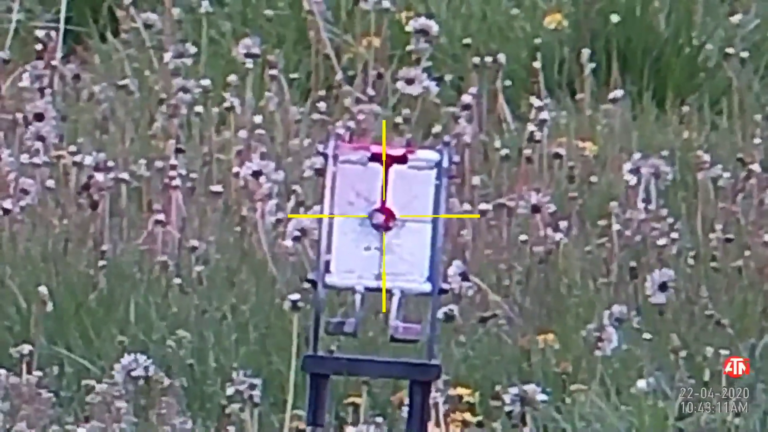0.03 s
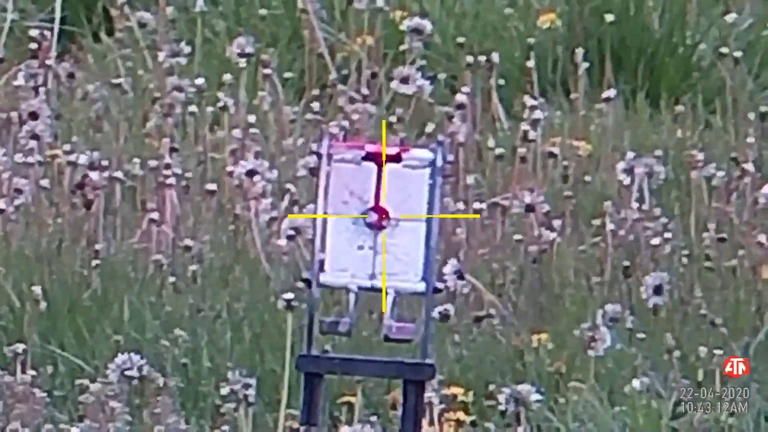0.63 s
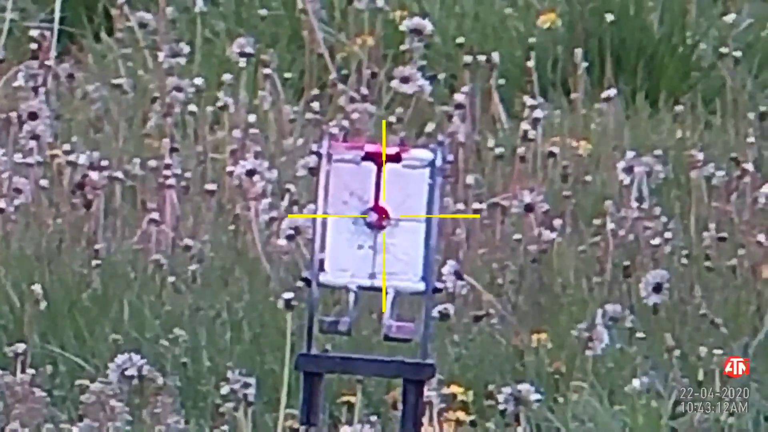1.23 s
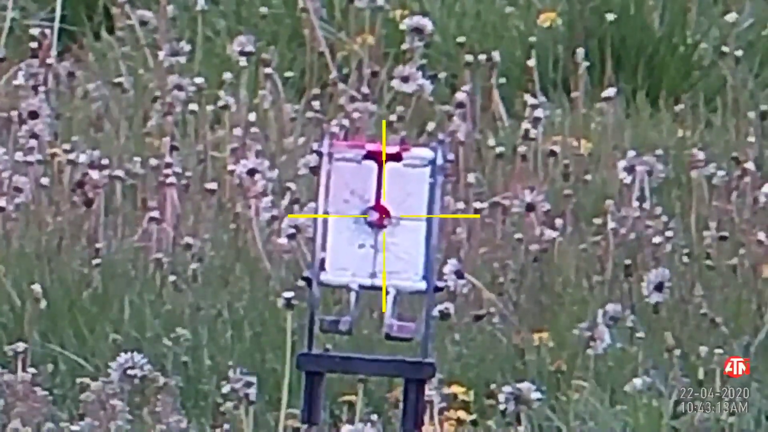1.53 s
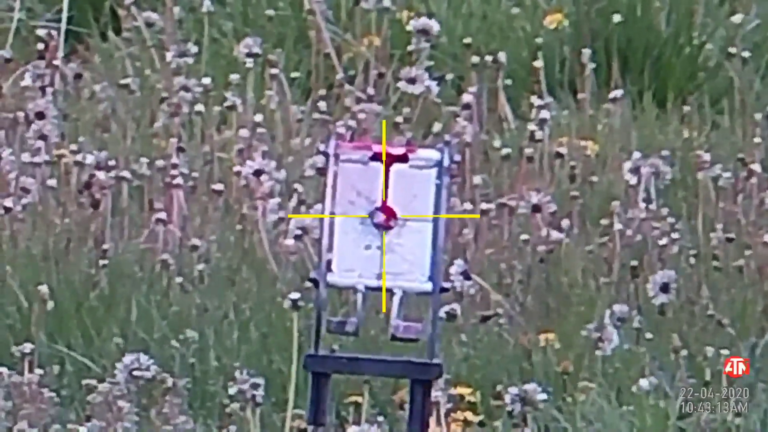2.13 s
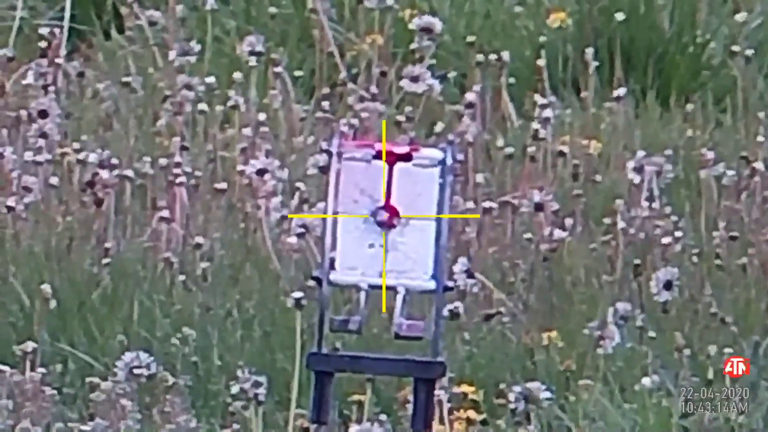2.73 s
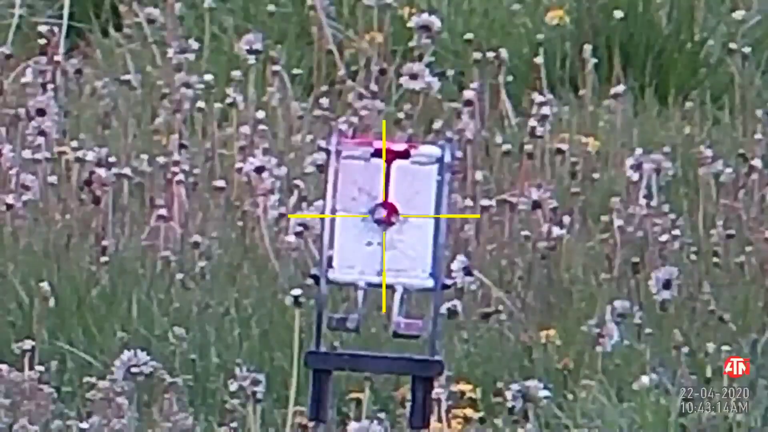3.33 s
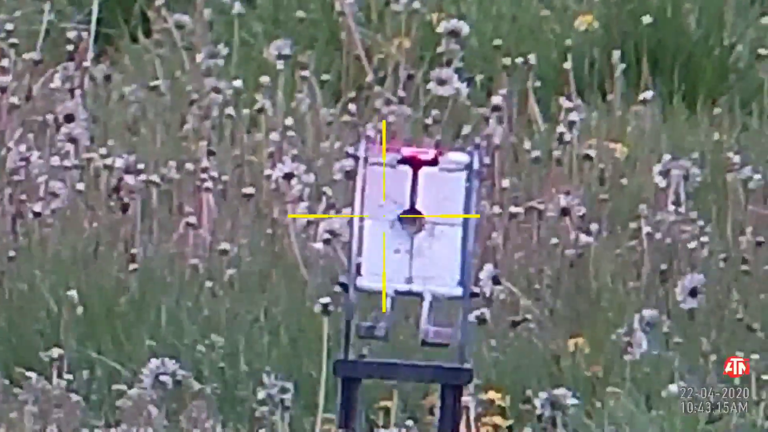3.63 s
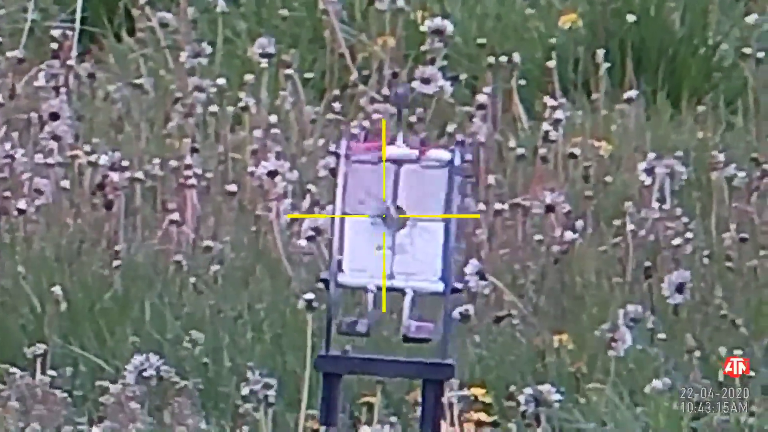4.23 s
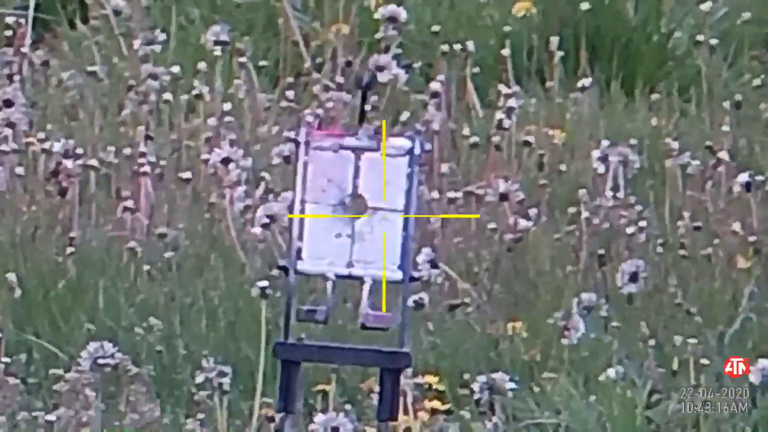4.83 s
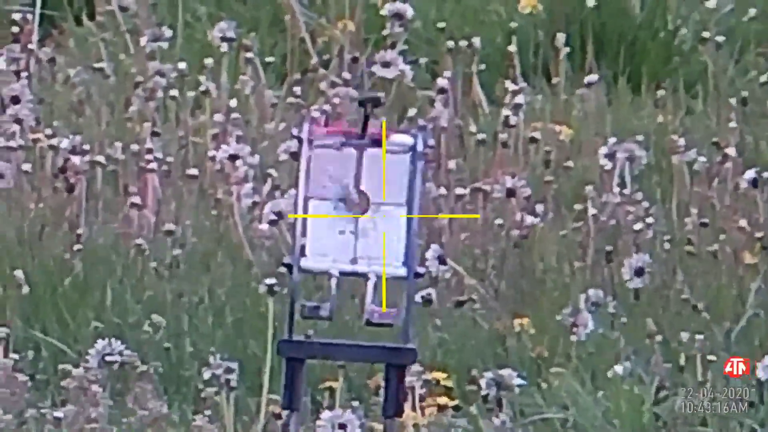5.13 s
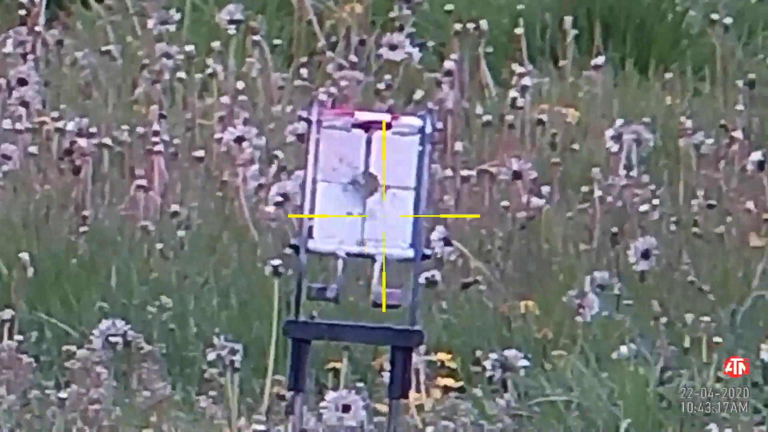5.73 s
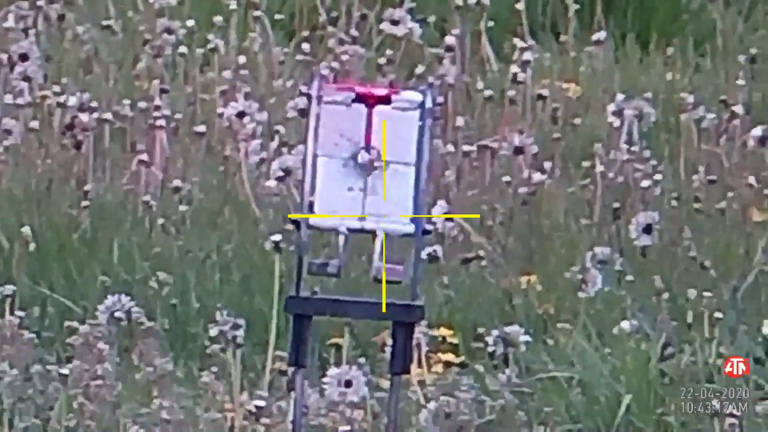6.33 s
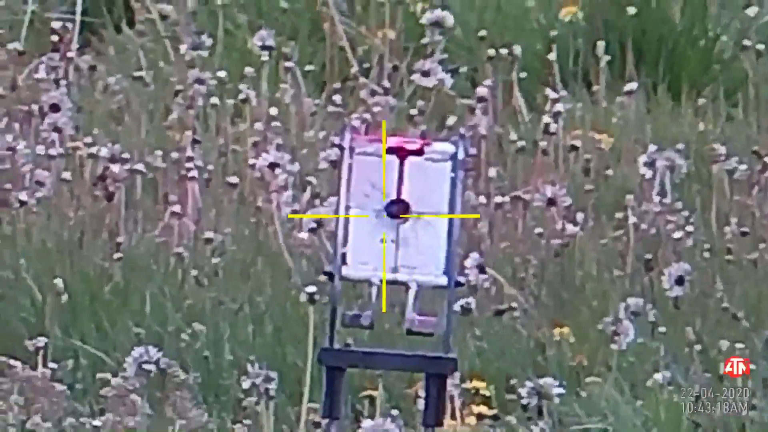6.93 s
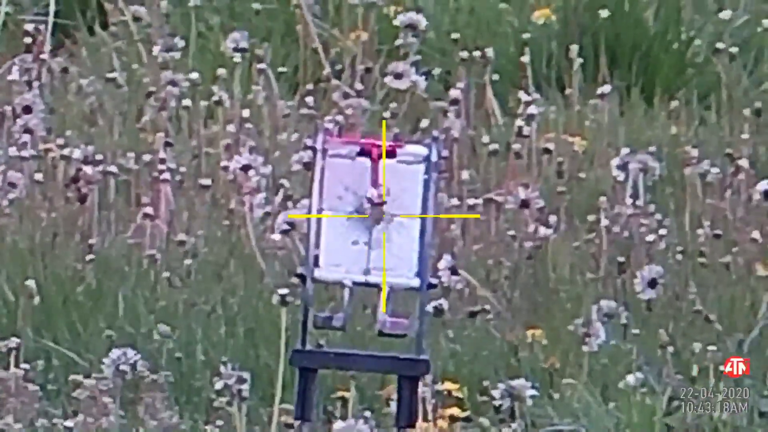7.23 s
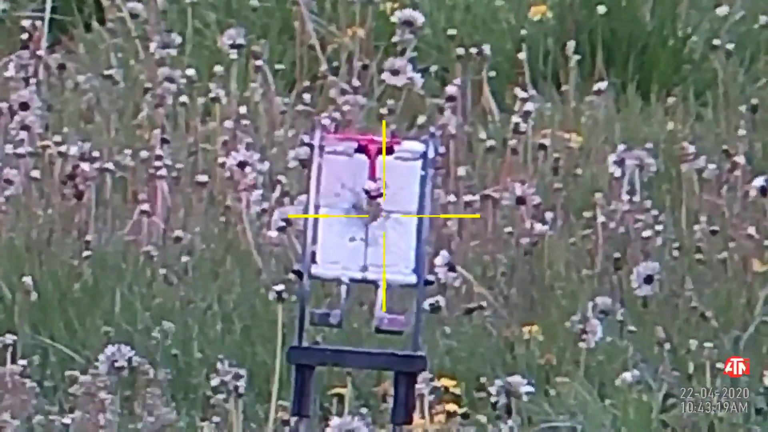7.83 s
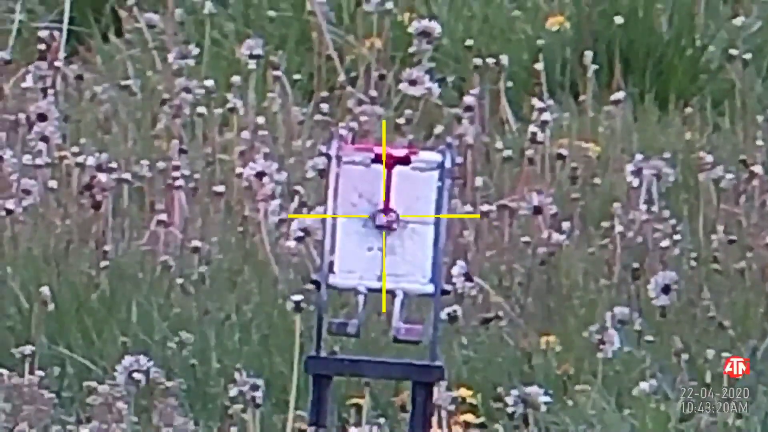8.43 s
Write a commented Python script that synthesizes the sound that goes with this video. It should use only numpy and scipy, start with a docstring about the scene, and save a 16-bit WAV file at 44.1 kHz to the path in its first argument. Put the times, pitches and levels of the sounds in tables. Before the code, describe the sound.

Small birds sing faintly over a light breeze in an open meadow, and a soft shot sounds far away. Then an air rifle fires right at the microphone with a loud snap, a hiss and a brief metallic ring. A moment later the pellet hits a target with a sharp crack that echoes around the field. Steel parts click, and thin bird calls carry on over slight handling noises.

```python
"""Air rifle in a meadow

Small birds sing over a faint breeze and the whine of an electronic sight; another shot sounds far off.
The rifle's sudden release of air overloads the microphone on the sight, and impacts ring the modes of
the action. Hiss trails the receding pellet, whose sharp hit reverberates round the field.
Steel parts click, and distant trees reflect the shot as a soft wash."""
import sys
import numpy as np
from scipy import signal
from scipy.fft import rfft, irfft, next_fast_len
from scipy.io import wavfile
from scipy.ndimage import map_coordinates

SR = 44100
rng = np.random.default_rng(int(sys.argv[2]) if len(sys.argv) > 2 else 0)


def output_pcm(signal):
    """Save a mono or channel-first signal as 16-bit PCM at the path in sys.argv[1].

    Samples are clipped to [-1, 1] before scaling.
    """
    pcm = np.clip(np.atleast_2d(signal).T, -1, 1) * 32767
    wavfile.write(sys.argv[1], SR, np.round(pcm).astype(np.int16))


N = 374850
T = np.arange(N) / SR
AGE = np.arange(SR) / SR  # t/s since an onset, one second long


def amp(db):
    """Amplitude ratio: tenfold for every 20 dB."""
    return 10 ** (np.asarray(db) / 20)


def unit(x):
    """Normalisation to rms 1."""
    return x / np.sqrt(np.mean(x ** 2) + 1e-20)


def along(points, hz):
    """Interpolation of (f/Hz, value) points on a logarithmic frequency axis."""
    f, v = np.transpose(points)
    return np.interp(np.log(hz + 1), np.log(f + 1), v)


def at(s, x):
    """Pure delay: x begins at time s."""
    return np.pad(x, (round(s * SR), N))[:N]


def wobble(rate):
    """Smooth random modulation: a spline through rate knots a second."""
    return map_coordinates(rng.standard_normal(int(N * rate / SR) + 4), [T * rate / SR])


def swells(rows):
    """Gaussian envelopes summed from rows of t/s, half-width/s, level/dB."""
    return sum(amp(db) * np.exp(-((T - s) / half) ** 2) for s, half, db in rows)


def burst(t60, rise=.0003, hold=0):
    """Transient envelope: a rise, a hold, then exponential decay by 60 dB in t60 seconds."""
    return (1 - np.exp(-AGE / rise)) * amp(-60 * np.maximum(AGE - hold, 0) / t60)


def filtered(x, response):
    """Linear filtering: the spectrum of x times a frequency response."""
    n = x.shape[-1]
    size = next_fast_len(n + SR // 10, real=True)
    return irfft(rfft(x, size) * response(np.fft.rfftfreq(size, 1 / SR)), size)[..., :n]


def noise(spectrum, size=N, tilt_db=0):
    """Spectral shaping: noise of rms 1 from (f/Hz, relative level/dB) points and a tilt per octave."""
    response = lambda hz: amp(along(spectrum, hz) + tilt_db * np.log2(hz / 1000 + 1))
    return unit(filtered(rng.standard_normal(size), response))


def glide(length, first_hz, middle_hz, last_hz, db):
    """Frequency and amplitude modulation: a parabola through three pitches, a half-sine envelope."""
    u = AGE[AGE < length] / length
    hz = np.polyval(np.polyfit([0, .5, 1], [first_hz, middle_hz, last_hz], 2), u)
    return hz, amp(db) * np.sin(np.pi * u)


def add_tone(track, s, hz, gain, waver):
    """Phase integrates frequency: a tone is added at time s, made hoarse by fast random modulation."""
    age = np.arange(len(hz))
    jitter = np.interp(age / SR, np.arange(600) / 600, rng.standard_normal(600))
    tone = np.sqrt(2) * gain * np.sin(2 * np.pi * np.cumsum(hz * (1 + waver * jitter)) / SR)
    i = round(s * SR) + age
    inside = (i >= 0) & (i < N)
    track[i[inside]] += tone[inside]


def outdoors(x, wet_db, t60):
    """Diffuse reflection from grass and trees: x plus its convolution with decaying noise."""
    tail = rng.standard_normal(SR) * burst(t60, rise=.0073)
    return x + amp(wet_db) * signal.oaconvolve(x, tail / np.linalg.norm(tail))[:N]


def strike(modes, db, tilt_db, struck_hz, accent_db, rattle_t60):
    """Modal superposition: an impulse and its chatter excite resonances, accented near struck_hz."""
    chatter = (burst(rattle_t60) * rng.standard_normal(SR))[:SR // 10]
    force = signal.unit_impulse(len(chatter)) + .6 * chatter / np.linalg.norm(chatter)
    accent = lambda f: accent_db * np.exp(-(np.log2(f / struck_hz) / .2) ** 2)
    gain = lambda f, level: amp(level + tilt_db * np.log2(f / 1000 + 1) + accent(f))
    # neighbouring modes swing in antiphase
    body = lambda hz: sum((-1) ** k * gain(f, level) * 1j * hz * bw / (f * f - hz ** 2 + 1j * hz * bw)
                          for k, (f, bw, level) in enumerate(modes))
    ring = filtered(force, body)
    return amp(db) * ring / np.linalg.norm(ring) * np.sqrt(SR * .003)  # the energy of 3 ms at this level


# still air: f/Hz, relative level/dB
AIR_SPECTRUM = [(20, -2.5), (60, -7.5), (150, -8.5), (400, -14), (800, -16.5), (1500, -20), (3000, -21.5),
                (7000, -23.5), (12000, -25), (15500, -22.5)]
# likeness of the air at left and right: f/Hz, correlation
AIR_CORRELATION = [(60, 0.03), (180, 0.4), (550, 0.85), (1650, 0.87), (4970, 0.76), (15000, 0.59)]
# gusts: t/s, half-width/s, level/dB
BREEZE_GUSTS = [(.05, .6, -76), (6.15, .2, -76), (6.7, .28, -73), (8.45, .22, -75)]


def meadow():
    """Partial coherence: still air differs left and right, under rumble, breeze and a brief low drone."""
    angle = lambda hz: np.arccos(np.clip(along(AIR_CORRELATION, hz), -1, 1)) / 2
    mid = filtered(noise(AIR_SPECTRUM), lambda hz: np.cos(angle(hz)))
    side = filtered(noise(AIR_SPECTRUM), lambda hz: np.sin(angle(hz)))
    deep = [(3, 0), (15, -2.5), (35, -17), (90, -35.5), (400, -80)]
    rumble = amp(-70 + 2 * wobble(4)) * np.array([noise(deep), noise(deep)])
    wind = (amp(-80) + swells(BREEZE_GUSTS)) * amp(wobble(6))
    breeze = wind * noise([(60, -7), (180, -1), (300, -2), (1400, -.5), (4000, -9), (14000, -22.5)])
    drone = swells([(.6, .42, -77.5)]) * noise([(100, -40), (170, -12), (195, 0), (225, -14), (500, -60)])
    return amp(-67.5) * np.array([mid + side, mid - side]) + rumble + breeze + drone


# harmonics of the whine, fundamental first: level/dB
WHINE_HARMONICS = [-82, -83.5, -87, -91]


def electronics(whine_hz=720, frame_hz=60, skip_share=.25, pip_width_s=.0009):
    """Harmonic series and pulse train: the sight whines steadily and pips on most of its frames."""
    whine = np.zeros(N)
    for k, db in enumerate(WHINE_HARMONICS, 1):
        phase = 2 * np.pi * (k * whine_hz * T + rng.random()) + .15 * k * wobble(3)
        whine += np.sqrt(2) * amp(db) * np.sin(phase)
    frame, part = np.divmod(T * frame_hz, 1)
    present = (rng.random(int(frame[-1]) + 1) > skip_share)[frame.astype(int)]
    pips = present * np.exp(-((part - .5) / frame_hz / pip_width_s) ** 2)
    band = [(12000, -60), (13300, -14), (13700, 0), (14050, 0), (14600, -22), (15050, -9), (15600, -30)]
    return whine + amp(-63) * pips * noise(band)


# notes of a phrase: delay/s, duration/s, first f/Hz, middle f/Hz, last f/Hz, relative level/dB
SONG_NOTES = [(.002, .038, 2200, 2600, 2720, -2), (.047, .023, 3700, 3270, 3130, 3.5),
              (.118, .074, 1900, 2070, 1320, -6)]
# phrases: t/s, level/dB
SONG_PHRASES = [(-.145, -55.5), (.090, -59.5), (.318, -59), (.553, -61.5), (.790, -62), (1.038, -65.5)]
# faint rising peeps: t/s, level/dB
SONG_PEEPS = [(2.996, -71), (3.218, -71), (3.446, -73)]


def songbird(scatter_db=1.2):
    """Frequency glides: a rising note, a flick and an arch, four times a second; later a few peeps."""
    song = np.zeros(N)
    for s, db in SONG_PHRASES:
        for delay, *shape, note_db in SONG_NOTES if s < 1 else SONG_NOTES[:2]:  # last phrase breaks off
            add_tone(song, s + delay, *glide(*shape, db + note_db + rng.normal(0, scatter_db)), waver=.02)
    for s, db in SONG_PEEPS:
        add_tone(song, s, *glide(.018, 2700, 3200, 3450, db), waver=.006)
    return outdoors(song, wet_db=-1.5, t60=.65)


# thin bird calls: t/s, peak f/Hz, duration/s, relative level/dB, frequency ratio of the second voice
HIGH_CALLS = [(.5, 7050, .16, -62.5, .8), (1.138, 6950, .21, -63.5, .86), (1.758, 7200, .13, -62, .84),
              (2.475, 6650, .16, -68, .85), (3.067, 7270, .19, -65, .79), (4.341, 6880, .26, -57.5, 1.16),
              (5.025, 7000, .28, -55.5, 1.12), (5.685, 7510, .11, -65, .78), (5.785, 6850, .075, -61, .8),
              (5.895, 6600, .14, -66, .76), (6.336, 7350, .19, -62.5, .79), (6.53, 7000, .065, -60.5, .88),
              (6.968, 7330, .2, -61, .8), (7.175, 7050, .065, -61.5, .88), (7.65, 7250, .2, -62, .8),
              (8.316, 7130, .17, -64.5, .8)]


def high_calls(peak_s=.027, width_s=.032, drop_share=.08, drop_db=11, sag_hz_per_s=500):
    """Biphonation: both sides of the syrinx sing a hoarse arch that drops to a softer, sinking trail."""
    calls = np.zeros(N)
    for s, peak_hz, length, db, ratio in HIGH_CALLS:
        t = AGE[AGE < length]
        below_peak = 1 - np.exp(-((t - peak_s) / width_s) ** 2)
        hz = peak_hz * (1 - drop_share * below_peak) - sag_hz_per_s * (t - peak_s)
        gain = amp(db - drop_db * below_peak) * signal.windows.tukey(len(t), .15)
        add_tone(calls, s, hz, gain, waver=.027)
        add_tone(calls, s, ratio * hz, amp(-9) * gain, waver=.02)
    return amp(-6) * outdoors(calls * amp(2 * wobble(30)), wet_db=-1, t60=.4)


# strokes of cloth: t/s, half-width/s, level/dB
SLEEVE_RUSTLES = [(1.163, .04, -71), (2.513, 0.034, -73.5), (6.163, 0.055, -62), (8.327, .04, -71),
                  (8.47, .03, -65.5)]


def sleeve():
    """Friction noise: a sleeve brushes the stock."""
    return swells(SLEEVE_RUSTLES) * noise([(200, -11), (2000, 5), (7000, -.5), (14000, -9)])


# whistles: t/s, duration/s, first f/Hz, middle f/Hz, last f/Hz, relative level/dB, fractional waver
BIRD_WHISTLES = [(1.41, .36, 2100, 2590, 2500, -64.5, .018), (1.99, .12, 2550, 2600, 2570, -62, .018),
                 (2.2, .14, 2540, 2600, 2560, -71.5, .018), (6.3, .28, 2800, 3300, 4150, -75, .007),
                 (6.53, .27, 4050, 3580, 4400, -74.5, .007), (6.76, .1, 4100, 4430, 4200, -77, .007),
                 (6.85, .2, 3700, 3300, 3020, -75.5, .007), (7.83, .5, 2270, 2780, 2950, -70.5, .055),
                 (8.44, .1, 2650, 2300, 1900, -64, .025)]


def distant_birds():
    """Slow frequency modulation: gliding whistles, clear or hoarse according to their waver."""
    song = np.zeros(N)
    for s, *note, waver in BIRD_WHISTLES:
        add_tone(song, s, *glide(*note), waver)
    return amp(-3) * outdoors(song, wet_db=-1.5, t60=.5)


# reverberation time of the field: f/Hz, T60/s
FIELD_DECAY = [(200, .75), (1000, 0.79), (2500, .8), (7000, 0.66), (10000, .5), (15000, 0.35)]


def field_decay(x, linger=1):
    """Frequency-dependent damping: each band of x dies away in linger times the field's T60."""
    hz, t, spectra = signal.stft(x, SR, nperseg=256)
    t60 = linger * along(FIELD_DECAY, hz)[:, None]
    return signal.istft(spectra * amp(-60 * t / t60), SR, nperseg=256)[1][:SR]


# a distant report and its hit: t/s, relative level/dB, tilt/(dB per octave)
FAR_REPORTS = [(1.8345, -39.5, 3), (1.8565, -40, 0.5)]
# their spectrum: f/Hz, relative level/dB
FAR_SPECTRUM = [(59, -51), (100, -15), (196, -15), (243, -5.5), (394, -9), (614, 0.5), (774, -7.5),
                (1260, -15), (3050, -9), (4460, -12.5), (7100, -11), (15500, -29)]


def far_shot():
    """Reverberant field: a shot and its hit, so far off that they are nearly all echo."""
    envelope = amp(-4) + amp(-10.5) * burst(t60=.36)
    return sum(at(s, amp(db) * envelope * field_decay(noise(FAR_SPECTRUM, SR, tilt)))
               for s, db, tilt in FAR_REPORTS)


SHOT_S = 3.5802  # the air leaves the muzzle
# the blast: f/Hz, relative level/dB
BLAST_SPECTRUM = [(25, -13.5), (60, -6), (150, -5), (500, -2), (1200, -7), (2000, 0), (3400, -3),
                  (6000, -2), (9000, -7), (15500, -12.5)]


def muzzle_blast():
    """Sudden expansion: released air makes a puff of noise and a low pressure pulse."""
    puff = amp(1) * np.exp(-((AGE - .0026) / .0018) ** 2) + amp(-14) * burst(t60=.053, rise=.002)
    u = AGE / .0022
    thump = amp(-21) * (1 - u) * np.exp(-u)  # compression, then rarefaction
    return at(SHOT_S, puff * noise(BLAST_SPECTRUM, SR)) + at(3.5832, thump)


# rushing air: f/Hz, relative level/dB
HISS_SPECTRUM = [(47, -54.5), (80, -26.5), (594, -28.5), (884, -15), (1260, -24.5), (1400, -14.5),
                 (1910, -19.5), (2280, -5), (2780, -16.5), (3540, -9.5), (5270, -7), (7490, -1),
                 (12200, -6), (15500, -15)]


def jet_and_flight(halving_s=.2):
    """Flow noise: the air jet hisses, and the pellet's duller hiss falls inversely with distance."""
    jet = amp(-20) * burst(t60=.26, hold=.046) * noise(HISS_SPECTRUM, SR)
    dulling = [(300, 3), (1600, .5), (2300, -6), (3000, 1), (5000, -.5), (9000, -2), (15000, -7)]
    dull_hiss = unit(filtered(noise(HISS_SPECTRUM, SR), lambda hz: amp(along(dulling, hz))))
    distance = 1 + AGE / halving_s
    flight = amp(-23) / distance * burst(t60=.24, hold=.265) * dull_hiss  # held nearly until the hit
    return at(SHOT_S, jet + flight)


# impacts in the action: t/s, level/dB, tilt/(dB per octave), accented f/Hz
ACTION_BLOWS = [(3.5826, 2, -2, 1950), (3.5955, -19, 1, 2800), (3.6465, -15.5, -2, 3450),
                (3.6869, -16, 7, 1950)]
# modes of the action: f/Hz, bandwidth/Hz, relative level/dB
ACTION_MODES = [(112, 200, -14), (420, 300, -8), (680, 130, -6), (940, 170, 0), (1400, 260, -4),
                (1950, 220, 4), (2190, 140, 2), (2400, 140, -2), (3340, 130, 1), (3500, 170, 0),
                (5000, 600, -6), (6300, 630, -6), (8730, 340, -3), (9700, 320, -4)]
# lightly damped steel parts: f/Hz, level/dB, T60/s
RINGING_MODES = [(2309, -21, .2), (6360, -32, .4), (6610, -29, .35), (7790, -29, .35)]


def rifle_action():
    """Free vibration: impacts rattle the action, and steel parts ring on after the shot."""
    blows = sum(at(s, strike(ACTION_MODES, db, tilt, hz, accent_db=8, rattle_t60=.014))
                for s, db, tilt, hz in ACTION_BLOWS)
    ring = sum(amp(db) * burst(t60) * np.sin(2 * np.pi * hz * AGE) for hz, db, t60 in RINGING_MODES)
    return blows + at(SHOT_S, ring)


# hard contacts of the pellet: t/s, level/dB, T60/s
HIT_CONTACTS = [(3.8898, 1, 0.0072), (3.8910, -7, 0.00405), (3.8923, -24, .015)]
# the direct crack: f/Hz, relative level/dB
CRACK_SPECTRUM = [(47, -47), (80, -36), (884, -36), (1850, -3), (3620, -12), (4410, -10), (4930, -21),
                  (6420, -4), (8550, 0), (11400, -27.5), (14500, -19), (15500, -33)]
# its echo: f/Hz, relative level/dB
HIT_ECHO_SPECTRUM = [(88, -61.5), (150, -31), (618, -26), (766, -25), (985, -22), (1040, -21), (2140, -5),
                     (3040, -5), (4840, -8), (6860, 1.5), (10500, -13.5), (14300, -20.5), (15500, -25)]


def pellet_hit(echo_s=3.892):
    """Backscattering: a hard double crack returns from the near grass, then from the whole field."""
    crack = sum(at(s, amp(db) * burst(t60, rise=.0001) * noise(CRACK_SPECTRUM, SR))
                for s, db, t60 in HIT_CONTACTS)
    echo = field_decay(noise(HIT_ECHO_SPECTRUM, SR), linger=1.18)
    near_grass = amp(-27) * burst(t60=.4, rise=.007)
    return crack + at(echo_s, echo * (amp(-31) + near_grass))


# clicks: t/s, level/dB, tilt/(dB per octave), accented f/Hz
STEEL_CLICKS = [(4.5510, -49, -1, 4800), (4.7321, -36, 3, 3500), (4.7338, -19.5, 0, 5900),
                (4.7349, -24, 0.5, 2200), (4.7455, -39, 1, 9000)]
# modes of the mechanism: f/Hz, bandwidth/Hz, relative level/dB
STEEL_MODES = [(620, 460, -10), (970, 200, -7), (1953, 120, 2), (2450, 210, -4), (3350, 110, -3),
               (3560, 180, 4), (4140, 250, -6), (5150, 270, -6.5), (6000, 250, -1), (6900, 600, 0.5),
               (8300, 400, 5), (8970, 400, 5), (9950, 600, 0), (11400, 800, -3.5), (12700, 450, 3),
               (13900, 700, 2.5)]


def mechanism():
    """Impact excitation: steel parts click, and the grass scatters the sound."""
    clicks = sum(at(s, strike(STEEL_MODES, db, tilt, hz, accent_db=8.5, rattle_t60=.012))
                 for s, db, tilt, hz in STEEL_CLICKS)
    scatter = noise([(500, -22), (2000, -8), (6500, -7), (9000, 0), (15000, -5)], SR)
    return clicks + at(4.738, amp(-45) * burst(t60=.38, rise=.004) * scatter)


# echo from the trees: f/Hz, relative level/dB
TREE_SPECTRUM = [(150, -25), (550, -15), (730, 0), (1080, -3), (1350, -14), (3000, -26), (4400, -17),
                 (6000, -24), (14000, -27)]


def tree_echo():
    """Delayed diffuse reflection: distant trees return the shot as a soft, hollow wash."""
    return at(4.745, amp(-53) * burst(t60=1.55, rise=.3) * noise(TREE_SPECTRUM, SR))


# soft taps: t/s, level/dB
STOCK_TAPS = [(5.941, -64), (6.005, -63), (6.85, -57)]


def finger_taps():
    """Damped resonance: fingers tap the stock, which sounds briefly in a narrow band."""
    band = [(1400, -25), (2000, 0), (2250, 0), (2800, -20), (9000, -35)]
    return sum(at(s, amp(db) * burst(t60=.054, rise=.002) * noise(band, SR)) for s, db in STOCK_TAPS)


def scene():
    """Superposition at the microphone: all is centred except the meadow's air and rumble."""
    background = meadow() + electronics()
    birds = songbird() + high_calls() + distant_birds()
    shots = far_shot() + muzzle_blast() + jet_and_flight() + rifle_action() + pellet_hit() + tree_echo()
    handling = sleeve() + mechanism() + finger_taps()
    return background + birds + shots + handling


def record(dry, cutoff_hz=15650):
    """Overload and band limiting: the input clips at full scale, then meets a steep low-pass filter."""
    return filtered(np.clip(dry, -1, 1), lambda hz: 1 / (1 + (hz / cutoff_hz) ** 200))


dry = scene()
out = record(dry)
output_pcm(out)
```